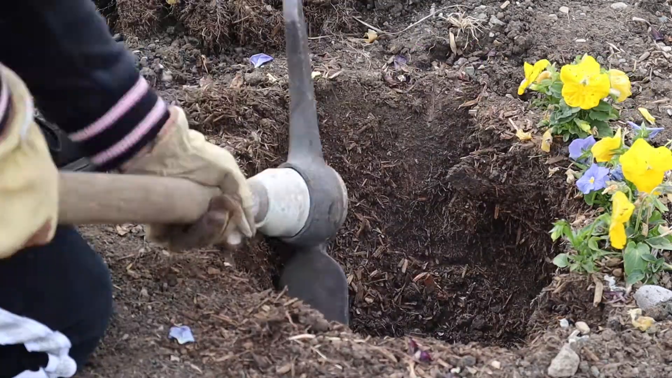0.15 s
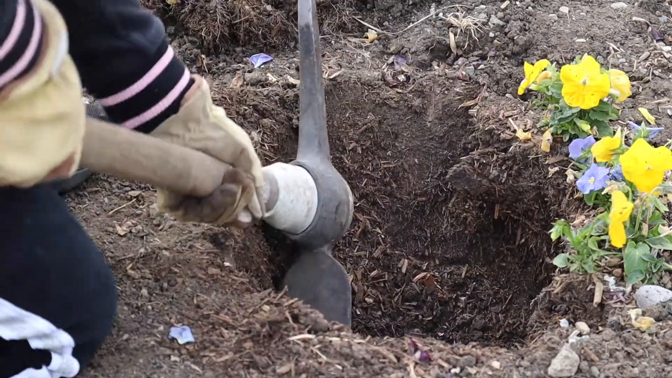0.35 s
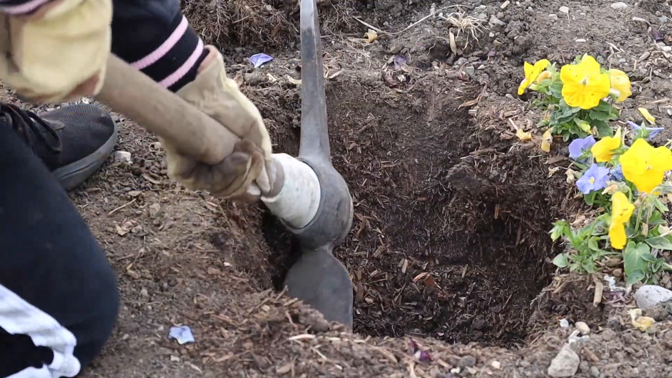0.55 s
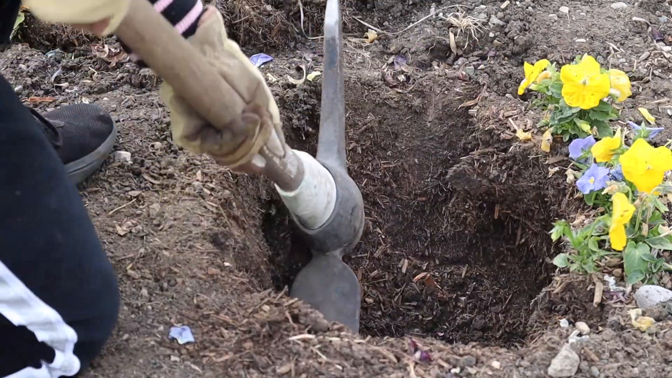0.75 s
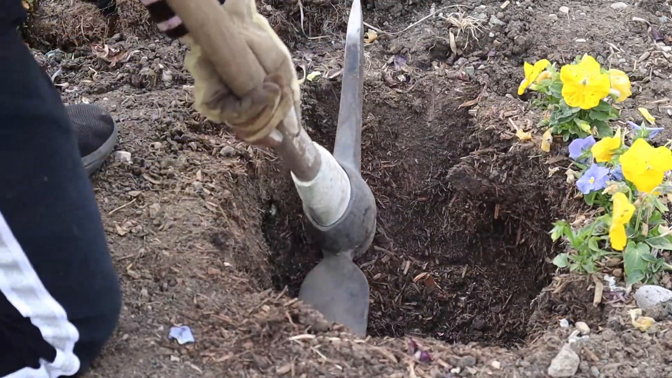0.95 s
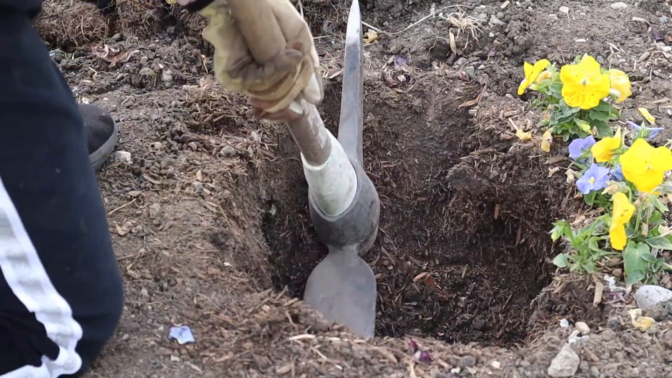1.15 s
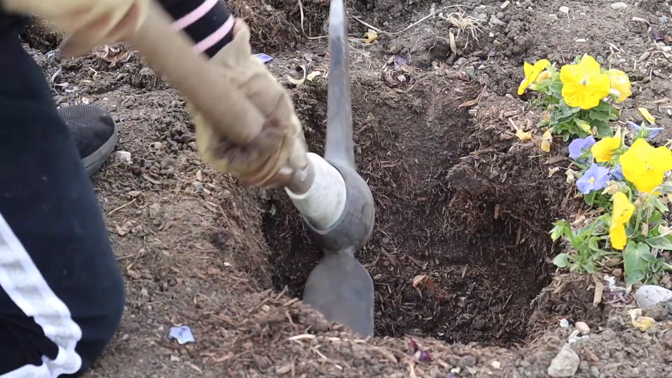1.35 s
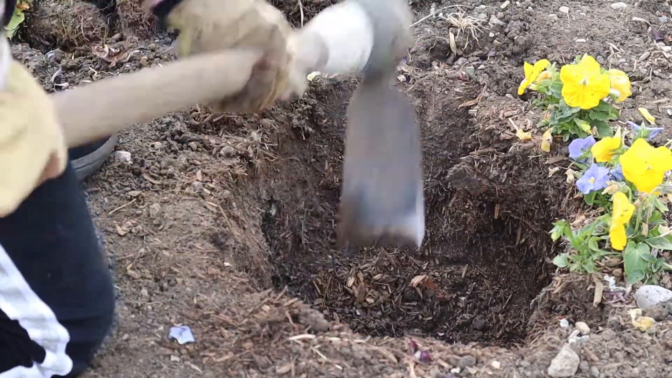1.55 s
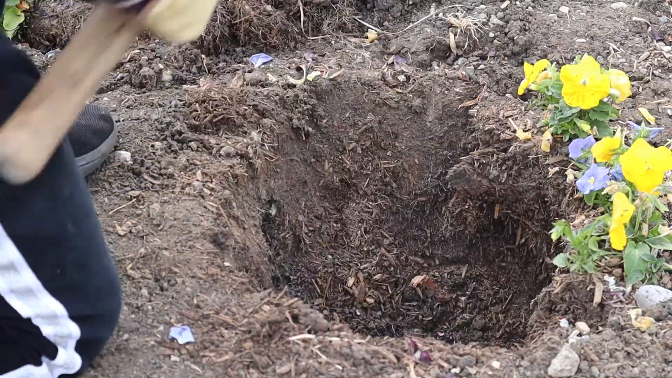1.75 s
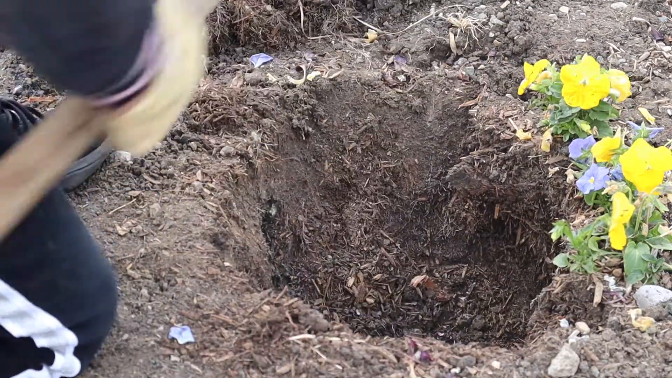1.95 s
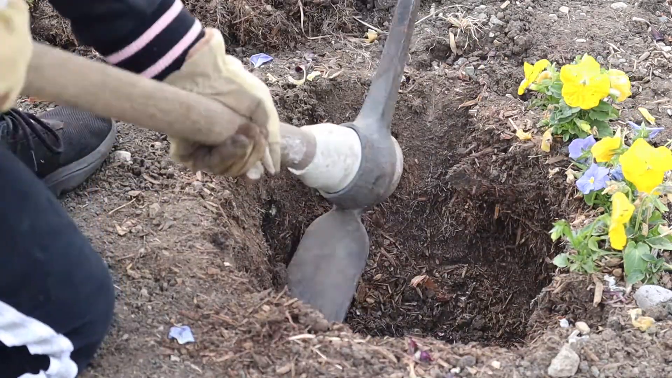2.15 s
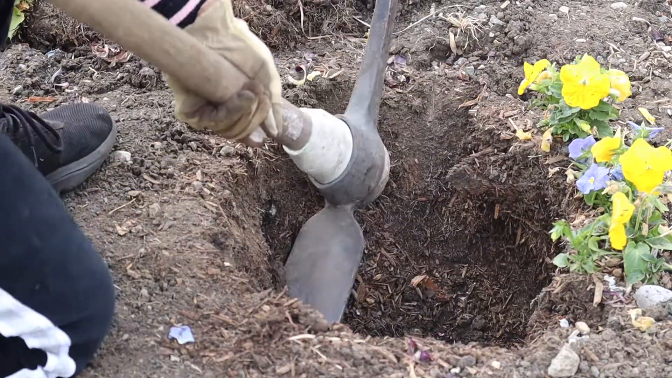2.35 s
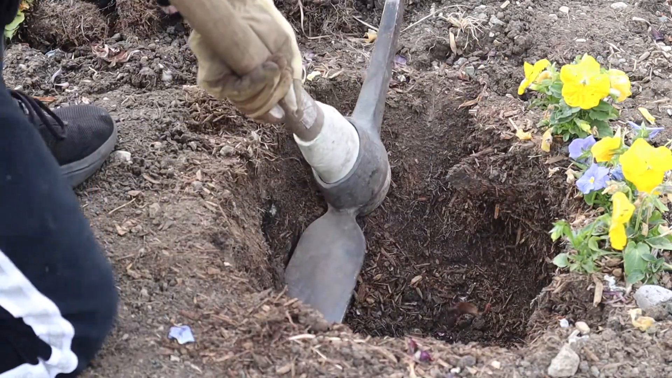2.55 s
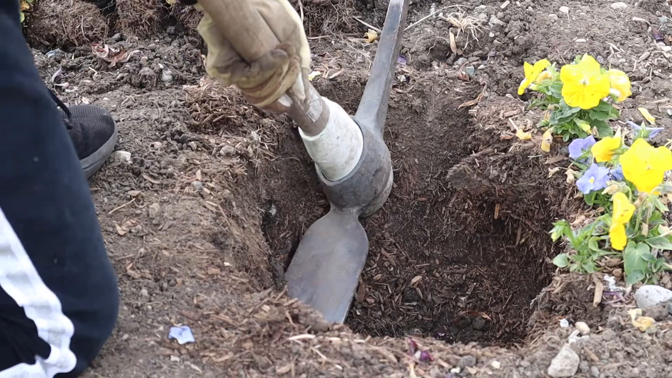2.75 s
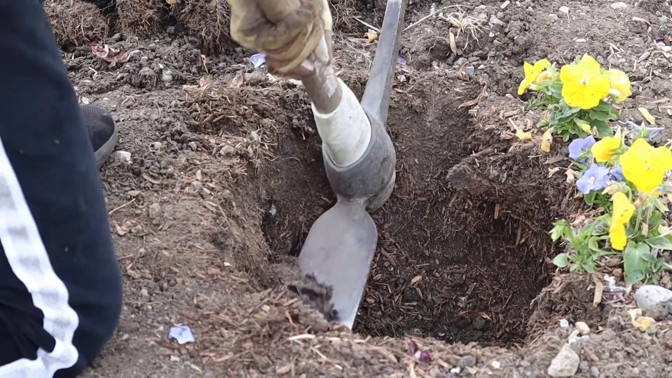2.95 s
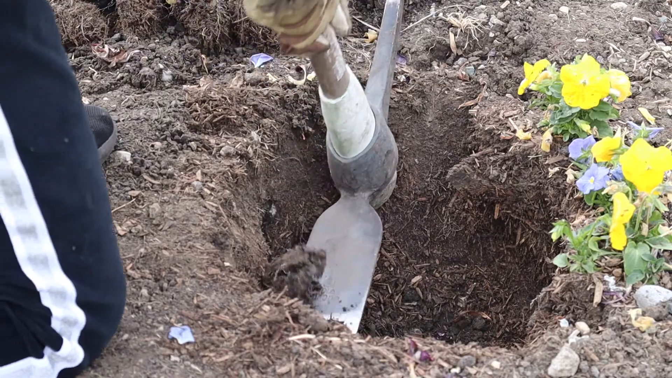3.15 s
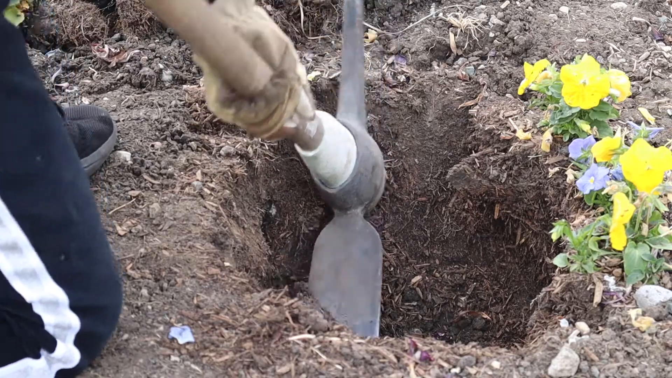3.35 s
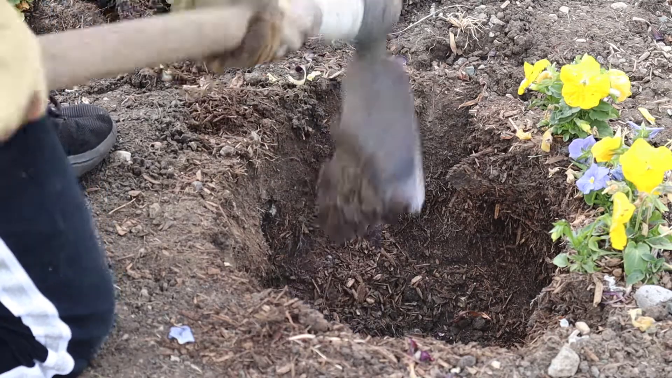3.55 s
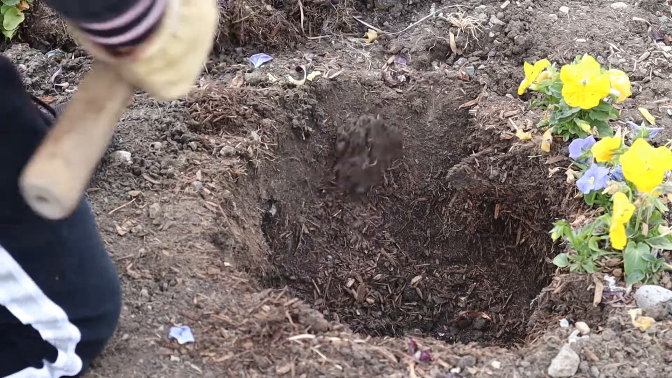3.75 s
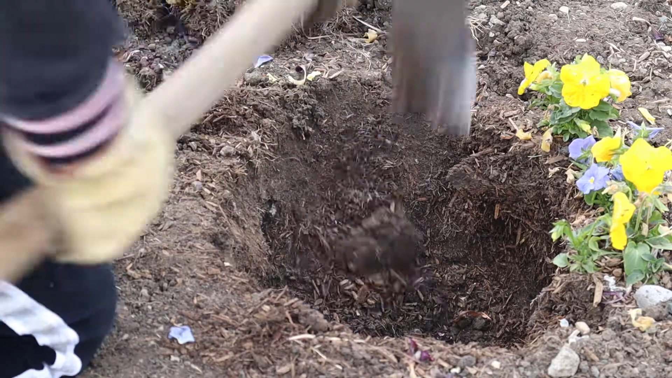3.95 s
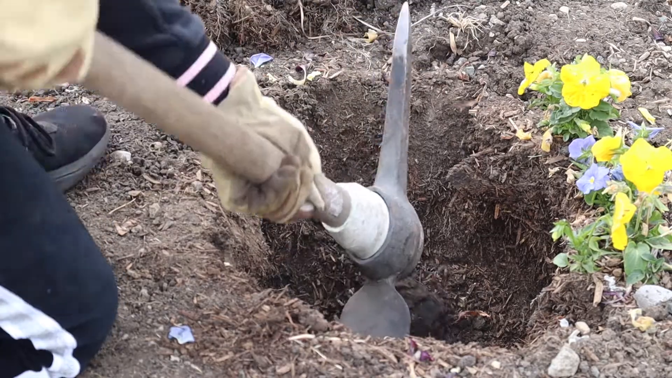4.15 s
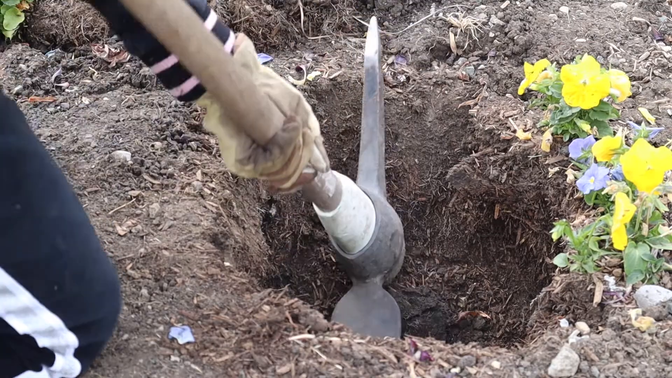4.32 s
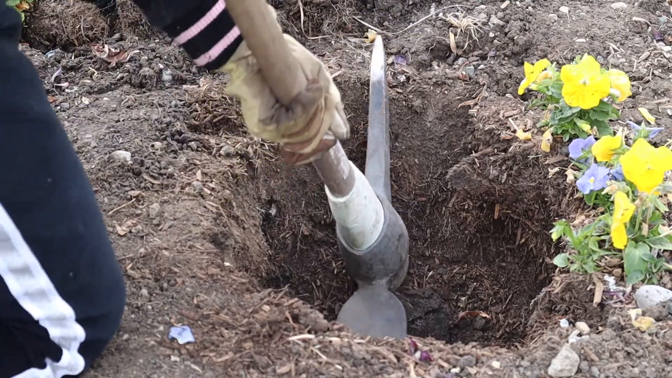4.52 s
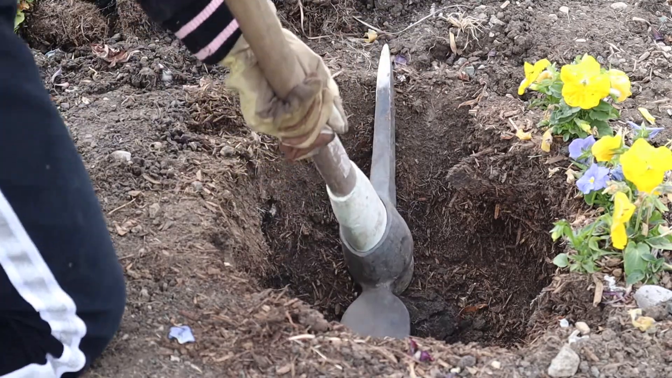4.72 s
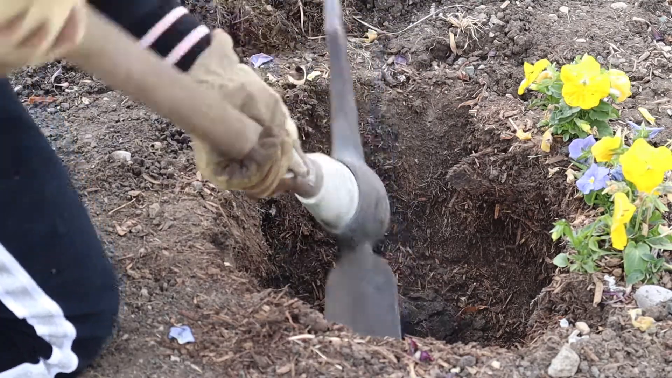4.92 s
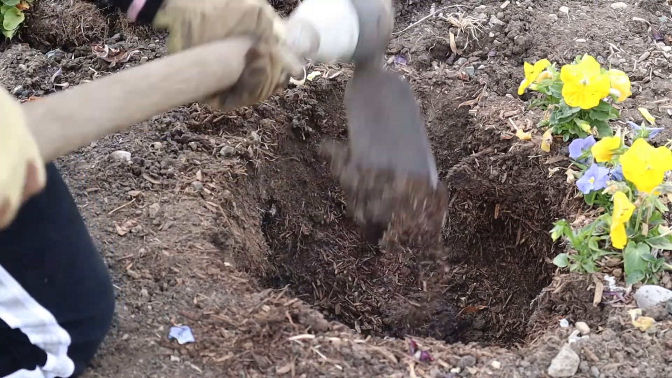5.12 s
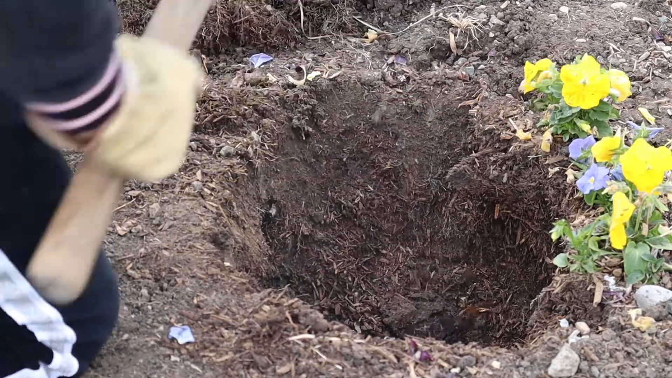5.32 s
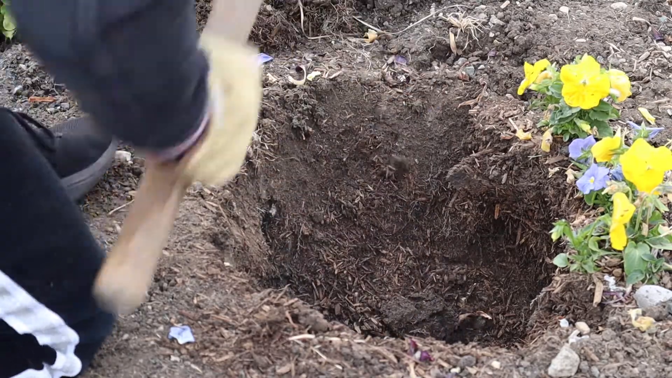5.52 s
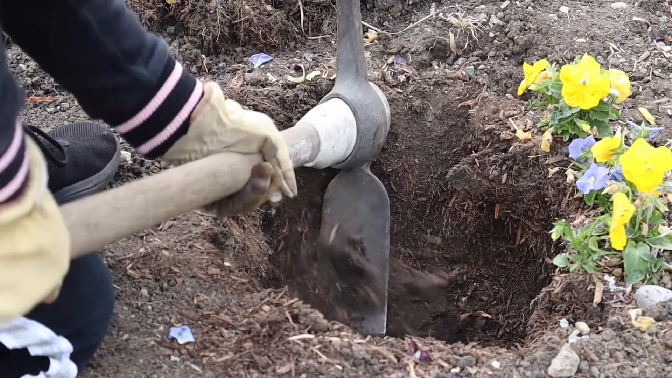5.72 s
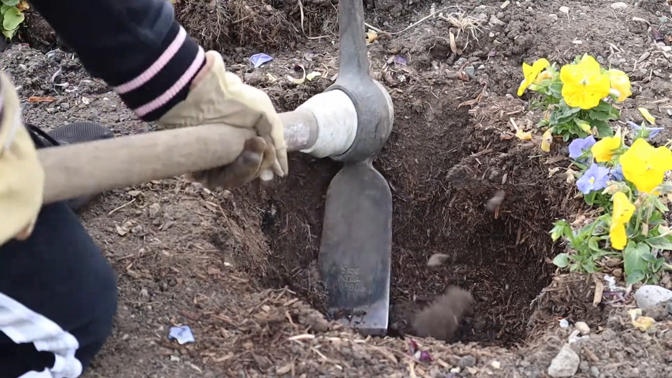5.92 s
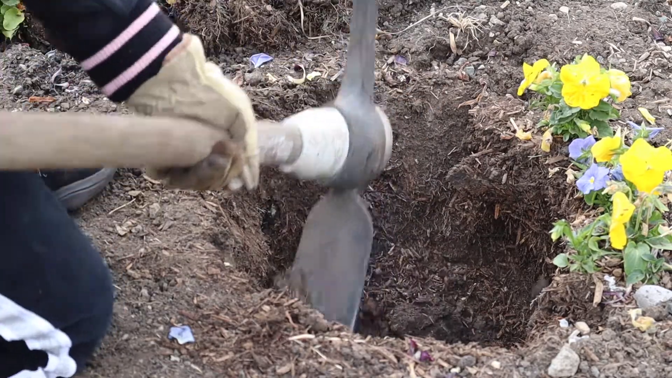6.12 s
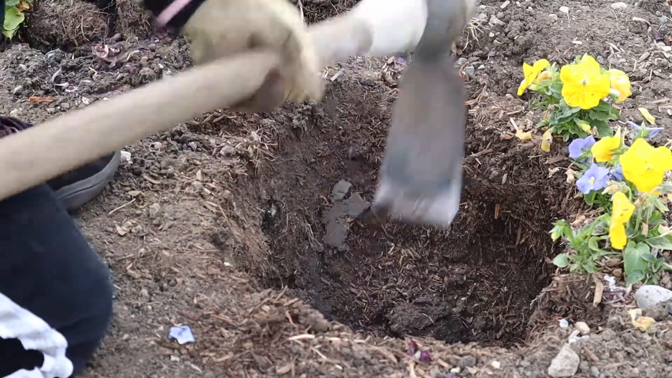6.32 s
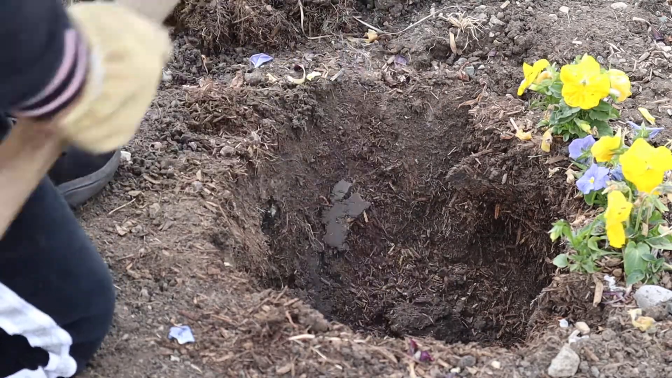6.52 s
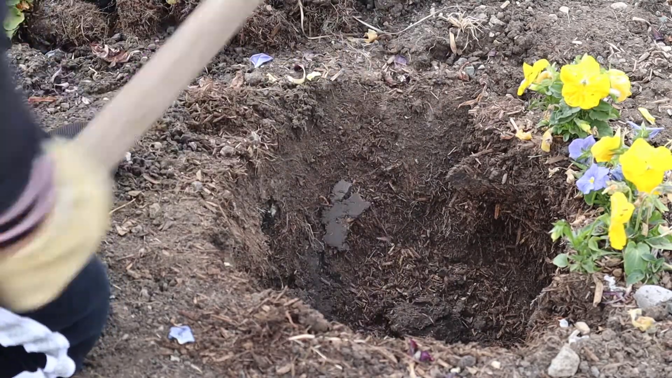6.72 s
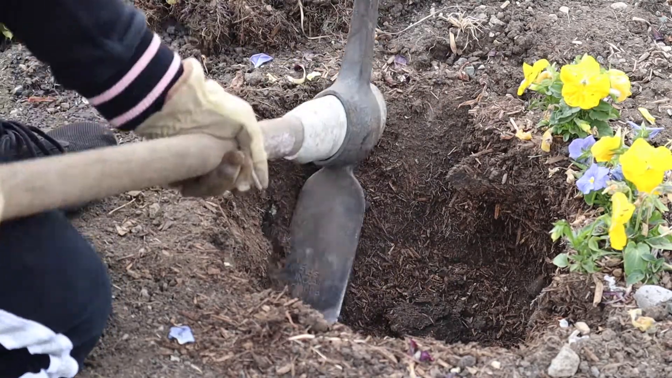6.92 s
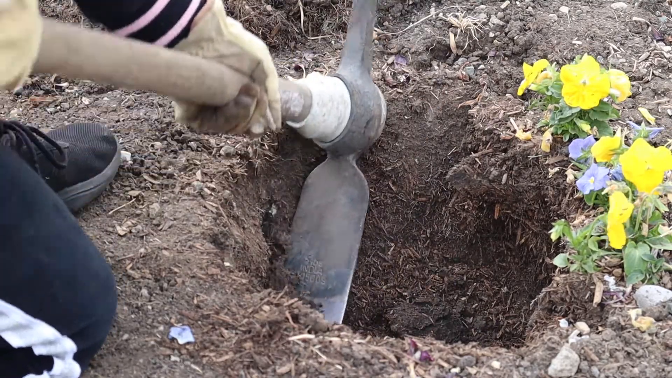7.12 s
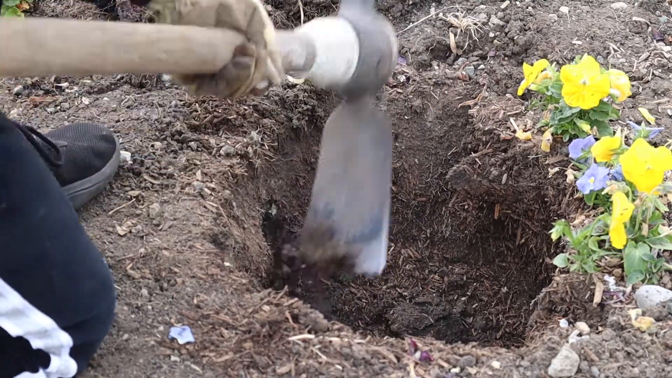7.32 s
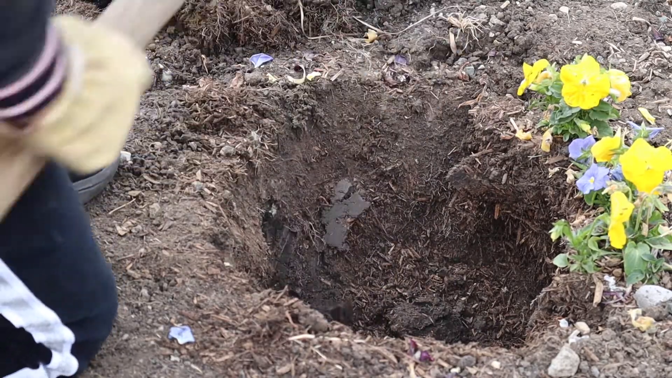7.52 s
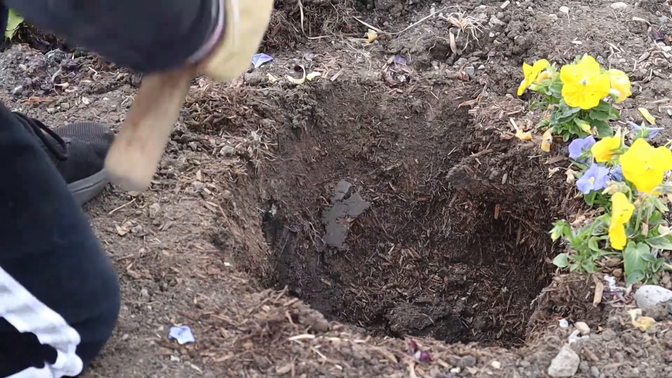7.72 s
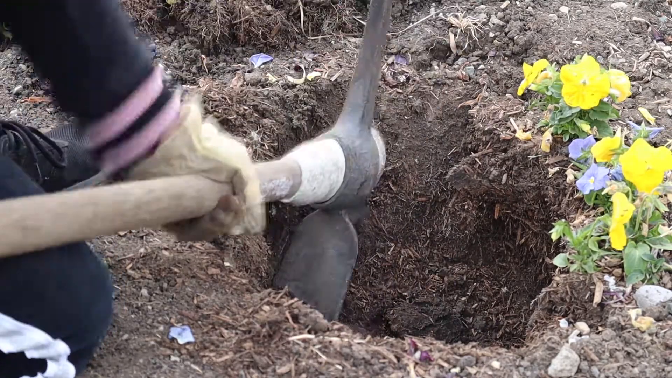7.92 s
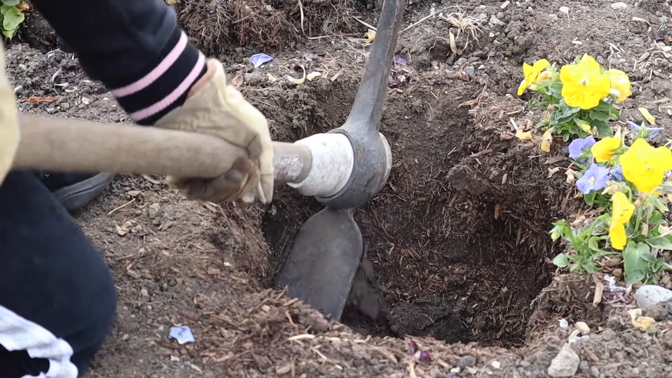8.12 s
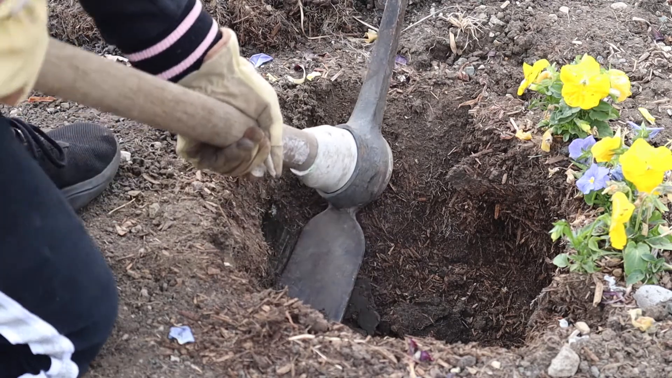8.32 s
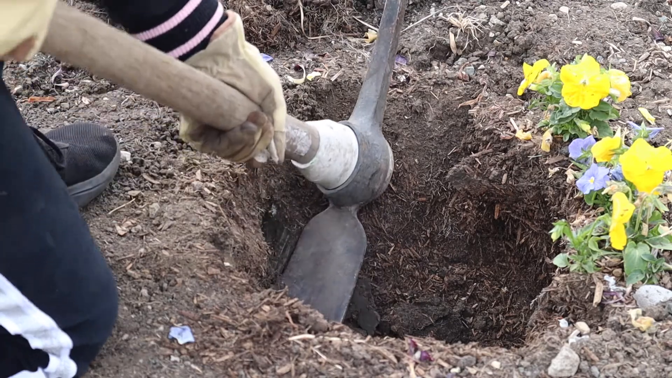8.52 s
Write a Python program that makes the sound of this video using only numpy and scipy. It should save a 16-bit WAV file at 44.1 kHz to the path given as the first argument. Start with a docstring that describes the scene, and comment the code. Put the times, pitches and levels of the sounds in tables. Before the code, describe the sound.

Outdoor garden digging heard right beside the hole: a crunchy, deep first chop, then sharper thuds, grit clinking under steel in the later blows, loose soil trickling and cloth brushing in between. Songbirds fill the gaps, with quick high chirps swelling into a raspy, buzzing burst before the third blow and another bright run before the fifth, over distant whistles, faint hum and low wind.

```python
"""Chopping clay in a garden

A mattock chops six times into hard clay: shaped noise crunches, the stop slaps air and sets hole, steel
and ground modes ringing, and short grit bursts clink. Between blows crumbs patter and a sleeve rustles.
Birds sing gliding sines with trills, twittering close by and whistling farther off in more echo.
Behind them lie a faint outdoor hum, gusty wind and a low rumble after each blow, all filtered noise."""
import sys
import numpy as np
from scipy import signal
from scipy.fft import rfft, irfft, next_fast_len
from scipy.io import wavfile

SR = 44100
rng = np.random.default_rng(int(sys.argv[2]) if len(sys.argv) > 2 else 0)


def wav_record(signal):
    """Record a signal, one row per channel, as 16-bit PCM in the file named by sys.argv[1]."""
    frames = np.transpose(np.atleast_2d(signal))
    bounded = np.clip(frames, -1, 1)
    # unit amplitude maps onto the largest positive 16-bit level
    quanta = np.round(bounded * 32767).astype(np.int16)
    wavfile.write(sys.argv[1], SR, quanta)


N = 377937

# Mattock blows: (blade stop [s], cutting time before it [s], thud drive [dB], slap level [dB],
# slap length [s], crunch level [dB], crunch tilt [dB/octave], blade drive [dB], ground drive [dB])
BLOWS = [(0.1645, 0.012, -9, -10.5, 0.0029, -4, -2, -32, 1.5),
         (2.076, 0.00071, -6.5, -3, 0.0015, -9, -1.5, -16, -8.5),
         (4.059, .004, -4.5, -0.5, 0.0022, -12, 0.5, -13, -6.5),
         (5.7077, 0.0043, -9.5, -3.5, 0.0013, -10, 2.5, -16, -7),
         (6.8276, 0.00097, -12.5, -5, 0.0018, -12.5, 2.5, -4.5, -9.5),
         (7.9644, 0.0082, -10, -2.5, 0.0016, -4, -0.5, -40, -7)]
EARS = np.array([[1], [-1]])   # opposite sign at the two ears


def from_db(db):
    """Decibels to amplitude ratio."""
    return 10 ** (np.asarray(db) / 20)


def rms_one(x):
    """Scale to rms 1."""
    return x / np.sqrt(np.mean(x ** 2) + 1e-20)


def add(out, time_s, sound):
    """Mix a sound in at a given time, cut off at the end of the scene."""
    i = max(int(time_s * SR), 0)
    out[i:i + len(sound)] += sound[:max(N - i, 0)]


def drift(rate_hz, size):
    """Smooth random wander: Gaussian knots of spread 1 joined by straight lines."""
    knots = rng.standard_normal(int(size * rate_hz / SR) + 3)
    return np.interp(np.arange(size) * rate_hz / SR, np.arange(len(knots)), knots)


def colour(x, spectrum, tilt_db=0):
    """Filter to a spectrum, tilted per octave about 700 Hz (no further below 175 Hz); rms 1."""
    size = next_fast_len(len(x))
    octave = np.log2(np.maximum(np.fft.rfftfreq(size, 1 / SR), 1) / 700)
    hz, db = np.transpose(spectrum)
    shape_db = np.interp(octave, np.log2(hz / 700), db) + tilt_db * np.maximum(octave, -2)
    filtered = irfft(rfft(x, size) * from_db(shape_db), size)
    return rms_one(filtered[:len(x)])


def noise(spectrum, size, tilt_db=0):
    """Coloured Gaussian noise of rms 1."""
    return colour(rng.standard_normal(size), spectrum, tilt_db)


def swells(rows):
    """Gain over time: each swell climbs to its peak and dies away, evenly in dB; the loudest wins."""
    range_db = 20.5   # gained over the rise, lost over the fall
    t = np.arange(N) / SR
    levels_db = []
    for peak_s, rise_s, fall_s, db in rows:
        before = (peak_s - t) / max(rise_s, .002)
        after = (t - peak_s) / max(fall_s, .002)
        levels_db.append(db - range_db * np.maximum(before, after))
    return from_db(np.max(levels_db, axis=0))


def ring(force, hz, t60_s):
    """Damped mode: a unit click sets a sine of height 1 ringing."""
    r, w = from_db(-60 / (t60_s * SR)), 2 * np.pi * hz / SR
    return signal.lfilter([0, np.sin(w)], [1, -2 * r * np.cos(w), r * r], force + 1e-18)


def push(length_s):
    """Smooth force pulse of unit area."""
    pulse = np.hanning(max(int(length_s * SR), 3) + 2)
    return pulse / pulse.sum()


def slap(length_s):
    """Air squeezed out by the blade: one swing up and one down, of height 1."""
    swing = np.diff(push(length_s))
    return swing / swing.max()


def mattock(entry_db=-11, crunch_s=0.0049, settle_db=-24, settle_s=0.026, boom_delay_s=0.0081, boom_push_s=.011):
    """The blade shears clay, then stops dead; the stop drives air, hole, steel and ground."""
    # Steel meets grit: (time [s], level [dB], decay time [s], blade drive relative to scratch [dB])
    stones = [(0.151, -37.5, 0.0055, -21), (0.169, -23.5, 0.0028, -43), (2.0754, -26, 0.012, -46),
              (4.0662, -19.5, 0.0021, -34), (5.707, -29, 0.0023, -31), (5.7092, -3.5, 0.0032, -36.5),
              (5.7158, -9.5, 0.002, -39), (5.721, -16.5, 0.0021, -26), (5.730, -16.5, 0.00096, -24.5),
              (5.769, -35, 0.0025, -36), (5.909, -30.5, 0.0023, -34), (5.895, -27.5, 0.0017, -36),
              (5.934, -33, 0.0026, -37), (6.058, -28.5, 0.011, -21.5), (6.071, -29.5, 0.0037, -23),
              (6.112, -37.5, 0.0047, -15), (6.8248, -6, 0.0023, -28), (6.833, -38, 0.0042, -29),
              (6.8456, -22, 0.0011, -36), (7.193, -31, 0.0015, -43), (7.966, -7, 0.0014, -48)]
    # Clay hole modes: (frequency [Hz], level [dB], t60 [s])
    clay_modes = [(169, -11, 0.14), (279, 0.5, 0.064), (418, -19.5, 0.017), (610, -24, 0.021),
                  (720, 2, 0.015)]
    # Head and handle modes: (frequency [Hz], level [dB], t60 [s])
    steel_modes = [(562, -10, .04), (700, -2.5, 0.057), (875, -3.5, 0.052), (994, 5.5, 0.036),
                   (1450, -38, .025), (1680, -3.5, 0.063), (2343, -1.5, 0.029), (2516, -6, 0.039),
                   (3590, -9, 0.064), (4243, -0.5, 0.054), (6530, -9, 0.036), (8750, -32, 0.018),
                   (10170, -0.5, 0.017), (14200, -10, .025)]
    # Springy ground, two close modes: (frequency [Hz], t60 [s])
    ground_modes = [(83, 0.27), (97, 0.34)]
    # Shearing clay spectrum: (frequency [Hz], relative level [dB])
    crunch = [(60, -40), (150, 4.5), (280, 1), (420, -6), (700, -10.5), (1000, -12), (1500, -9),
              (2200, -23.5), (4000, -26), (8000, -34), (16000, -48)]
    # Grit scratch spectrum: (frequency [Hz], relative level [dB])
    grit = [(300, 15), (1000, 0), (2500, 7.5), (4000, 6.5), (6000, -8), (7200, 2), (8800, 3), (11500, -7.5),
            (14000, -8), (16000, -20)]

    direct, thud, knock, shove = np.zeros((4, N))
    t = np.arange(SR // 4) / SR
    for stop_s, cut_s, thud_db, slap_db, contact_s, crunch_db, tilt_db, ring_db, boom_db in BLOWS:
        since_stop = np.maximum(t - cut_s, 0)
        sinking = from_db(entry_db) * np.sqrt(2 * t / cut_s)   # resistance grows with depth
        settling = np.exp(-since_stop / crunch_s) + from_db(settle_db) * np.exp(-since_stop / settle_s)
        shear = np.where(t < cut_s, sinking, settling)
        add(direct, stop_s - cut_s, from_db(crunch_db) * shear * noise(crunch, len(t), tilt_db))
        add(direct, stop_s, from_db(slap_db) * slap(contact_s))
        add(thud, stop_s, from_db(thud_db) * push(contact_s / 2))
        add(knock, stop_s, from_db(ring_db) * push(contact_s / 2))
        add(shove, stop_s + boom_delay_s, from_db(boom_db) * push(boom_push_s))
    for time_s, db, decay_s, ring_db in stones:
        scratch = from_db(db) * np.exp(-t / decay_s) * noise(grit, len(t))
        add(direct, time_s, scratch)
        add(knock, time_s, from_db(ring_db) * scratch)

    clay = sum(from_db(db) * ring(thud, hz, t60_s) for hz, db, t60_s in clay_modes)
    steel = sum((-1) ** k * from_db(db) * ring(knock, hz, t60_s)
                for k, (hz, db, t60_s) in enumerate(steel_modes))
    # the ground modes start opposed, so the boom swells and then beats
    boom = sum((-1) ** k * ring(shove, hz, t60_s) for k, (hz, t60_s) in enumerate(ground_modes))
    return direct + clay + steel + boom


def grains(spectrum, per_s, spread_db):
    """Tiny contacts of uneven size at random moments; rms 1."""
    sizes = from_db(spread_db * np.minimum(rng.exponential(1, N), 4)) * rng.choice([-1, 1], N)
    hits = rng.random(N) < per_s / SR
    return colour(sizes * hits, spectrum)


def handling(cloth_db=9):
    """Crumbs patter back into the hole (random grains) while cloth rubs (noise)."""
    # Crumb spectrum: (frequency [Hz], relative level [dB])
    crumbs = [(150, 1.5), (400, 6), (900, 7.5), (1600, 0.5), (3000, -8), (6000, -9), (10000, -36),
              (16000, -32)]
    # Sleeve and glove spectrum: (frequency [Hz], relative level [dB])
    fabric = [(400, -25), (1500, -7), (3500, 7), (6000, 3), (9000, -3), (12000, -11.5), (16000, -14)]
    # Soil sliding off the blade: (peak time [s], rise [s], fall [s], peak level [dB])
    spills = [(1.37, 0.095, 0.035, -41.5), (2.275, .04, 0.066, -38.5), (3.02, 0.024, 0.038, -34),
              (4.225, .03, 0.15, -33.5), (4.29, 0.11, 0.04, -30.5), (4.83, .06, .2, -45.5),
              (5.933, .01, 0.035, -40), (6.066, 0.073, 0.055, -35), (6.112, .01, 0.18, -35.5),
              (7.11, 0.067, 0.061, -37.5), (7.197, 0.029, 0.013, -30.5)]
    # Sleeve and glove rubs: (peak time [s], rise [s], fall [s], peak level before cloth_db [dB])
    rustles = [(.78, .3, 0.077, -46.5), (1.275, 0.097, 0.7, -53.5), (2.45, 0.99, .8, -53),
               (3.02, 1, 0.33, -51.5), (3.49, .08, .08, -48.5), (3.572, 0.027, 0.064, -46),
               (3.85, 0.35, 0.34, -52)]
    soil = swells(spills) * grains(crumbs, per_s=1000, spread_db=2.5)
    cloth = swells(rustles) * noise(fabric, N)
    return soil + from_db(cloth_db) * cloth


def garden(x, wet_db, t60_s, width, early_db, early_s):
    """One quick echo of opposite sign at the two ears, and a longer tail scattered by walls and foliage."""
    t = np.arange(SR) / SR
    fade = from_db(-60 * t / t60_s) * (1 - np.exp(-t / 0.0024))
    fade = fade / np.linalg.norm(fade)
    mid, side = (signal.oaconvolve(x, rng.standard_normal(SR) * fade)[:N] for _ in range(2))
    early = np.interp(np.arange(N) - early_s * SR, np.arange(N), x)
    difference = from_db(wet_db) * width * side + from_db(early_db) * early
    return x + from_db(wet_db) * mid + difference * EARS


def call(shape, time_s, db, pitch=1, stretch=1):
    """The notes of one call, moved in time, level and pitch."""
    return [(time_s + at_s * stretch, length_s * stretch, start * pitch, middle * pitch, end * pitch,
             db + note_db, depth_hz)
            for at_s, length_s, start, middle, end, note_db, depth_hz in shape]


def repeats(shape, rows):
    """The notes of a call every time it is sung."""
    return [note for row in rows for note in call(shape, *row)]


def glides(rows, bend):
    """Single notes that do a share (bend) of their log-pitch glide by the middle."""
    return [(time_s, length_s, start, start * (end / start) ** bend, end, db, 0)
            for time_s, length_s, start, end, db in rows]


def run_of_notes(course, gap_s, length_s, scatter, slope, depth_hz, uneven_db):
    """Notes of uneven length, slope and strength, scattered about a course of pitch and level."""
    times, hz, levels_db = np.transpose(course)
    chance = rng.uniform(-1, 1, (128, 5))
    notes = []
    for time_s, (late, high, long, steep, loud) in zip(np.arange(times[0], times[-1], gap_s), chance):
        pitch = np.interp(time_s, times, hz) * (1 + scatter * high)
        sag = slope * (.5 + steep)   # most notes fall
        db = np.interp(time_s, times, levels_db) + uneven_db * loud
        notes.append((time_s + late * gap_s / 2, length_s * (1 + long / 2),
                      pitch * (1 + sag), pitch, pitch * (1 - sag), db, depth_hz))
    return notes


def song(notes, trill_hz, waver, flutter_db, edge, overtone_db):
    """Each note is one gliding whistle; a fast trill swings its pitch and loudness into a buzz."""
    out = np.zeros(N)
    for time_s, length_s, start_hz, middle_hz, end_hz, db, depth_hz in notes:
        size = int(length_s * SR)
        u = np.linspace(0, 1, size)
        curve = np.polyfit([0, .5, 1], np.log([start_hz, middle_hz, end_hz]), 2)
        glide_hz = np.exp(np.polyval(curve, u))
        beat = 2 * np.pi * np.cumsum(trill_hz * (1 + .15 * drift(100, size))) / SR
        swing_hz = depth_hz * (np.sin(beat) + .3 * drift(1200, size))
        phase = 2 * np.pi * np.cumsum(glide_hz * (1 + waver * drift(95, size)) + swing_hz) / SR
        throb = 1 + np.clip(4 * depth_hz / middle_hz, 0, .8) * np.cos(beat)
        flutter = from_db(flutter_db * drift(140, size))
        swell = rms_one(signal.windows.tukey(size, np.clip(edge, .05, 1)) * throb * flutter)
        whistle = np.sin(phase) + from_db(overtone_db) * np.sin(2 * phase)
        add(out, time_s, from_db(db) * swell * whistle)
    return out


def birds(far_db=-2):
    """Quick twitterers close by, and slower whistlers deep in the garden's echo."""
    # Calls, note by note: (time into call [s], length [s], start [Hz], middle [Hz], end [Hz],
    # relative level [dB], trill depth [Hz])
    # short flicks, then a high falling note
    chirp = [(0, 0.0138, 4005, 4054, 4530, -3, 155), (.009, 0.0083, 4840, 4005, 3100, -4.5, 3),
             (.024, 0.0214, 3980, 3780, 3185, -2, 77), (.061, .028, 6030, 4910, 4690, 1, 0)]
    # high note that drops in two steps; columns as chirp
    slur = [(0, 0.044, 6950, 5965, 6010, -1.5, 0), (.034, .056, 5950, 4100, 3700, -3, 0)]
    # quick dip, two lifts and a falling rasp; columns as chirp
    rasp = [(0, .018, 4429, 3950, 3360, 1, 121), (.017, .016, 3410, 3970, 4100, 0.48, 120),
            (.042, .02, 3244, 3600, 4100, -.5, 100), (.053, .06, 3550, 3087, 2770, -2, 372)]
    # buzz that sinks, climbs and arches over; columns as chirp
    buzz = [(0, .075, 3900, 2850, 2500, -5, 397), (.07, .09, 2600, 3430, 3790, 0.5, 410),
            (.135, .225, 3940, 4370, 3910, 1.5, 430)]
    # steep rise that tips over into a buzzing fall; columns as chirp
    hook = [(0, 0.022, 5000, 6100, 7500, 0, 0), (.022, 0.02, 7360, 6260, 5400, 0, 600)]
    # whistle that sags, then climbs with a quaver; columns as chirp
    swoop = [(0, .12, 2300, 2056, 2075, 4.5, -9), (.22, .15, 2120, 2253, 2590, -5.5, 75),
             (.315, .05, 2250, 2450, 2750, 3.5, 86)]
    # long rounded dip that climbs back with a flutter; columns as chirp
    scoop = [(0, .14, 4650, 3400, 3250, -0.16, 8.6), (.137, .13, 3100, 3540, 4200, -.5, 130),
             (.257, .085, 4300, 4550, 4900, 0, 180)]
    # rising whistle that breaks into a trill; columns as chirp
    flourish = [(0, .06, 2034, 2225, 2420, 0, 0), (.05, 0.104, 2420, 2494, 2426, -2, 300)]
    # short note that leaps up and levels off; columns as chirp
    pip = [(0.0042, 0.037, 2400, 3560, 3400, 0, 0)]
    # four thin, quavering falls; columns as chirp
    warble = [(0, 0.071, 4500, 4200, 3540, -1, 300), (.13, 0.072, 6300, 6040, 5920, -1.5, 100),
              (.19, .065, 5600, 5250, 4370, 1, 550), (.248, .058, 8200, 8070, 7460, -10, 100)]

    # When each call is sung: (time [s], level [dB], pitch ratio [1], length ratio [1]), ratios optional
    chirp_times = [(1.952, -37.5, 1.07), (2.133, -41, 0.92), (2.289, -36, 1.02), (2.443, -32.5, 1.03),
                   (2.617, -29, 0.94), (5.778, -39, 0.99), (5.94, -35, 1.01), (6.256, -28, 1.0),
                   (6.419, -24.5, 0.98), (6.57, -23.5, 0.97), (6.733, -25, 0.99)]
    # slurs: columns as chirp_times
    slur_times = [(0.302, -43, 1.02, 0.88), (.624, -36, 1.01, 0.98), (.982, -34.5, 1, 1.07),
                  (1.651, -31, 1.06, 1.05), (2.33, -35, 1, 1.08), (2.668, -36.5, 0.95, 1.25),
                  (5.578, -47, 1, 1.1)]
    # rasps: columns as chirp_times
    rasp_times = [(2.775, -29.5, 1.015, 0.83), (2.934, -27, 0.99, 0.92), (3.088, -26, 1.007, 1.0),
                  (3.254, -24, .96, 1.25), (6.886, -27, .98, 1.0), (7.046, -27.5, 1.02, .88)]
    # buzzes: (time [s], level [dB])
    buzz_times = [(3.635, -28)]
    # hooks: (time [s], level [dB], pitch ratio [1])
    hook_times = [(3.472, -38, 1.06), (3.558, -32, 0.9)]
    # swoops: (time [s], level [dB])
    swoop_times = [(5.08, -40.5), (6.292, -42.5), (7.025, -42)]
    # scoops: (time [s], level [dB])
    scoop_times = [(.843, -37)]
    # flourishes: columns as chirp_times
    flourish_times = [(2.55, -45, 1.0, 0.76), (2.7, -39, .97, 0.77), (2.885, -40, .9, .6),
                      (4.162, -32.5, 1.0, 0.99), (8.138, -32, 0.98, 0.95)]
    # pips: columns as chirp_times
    pip_times = [(4.708, -40, 1.04, 1.1), (4.747, -33, 1.07, 1.2), (4.864, -36, 0.95, 0.79),
                 (4.898, -35.5, 1.04, 1.04), (7.314, -45, 2.09, 0.5), (7.634, -47, 2.1, 0.41)]
    # warbles: (time [s], level [dB])
    warble_times = [(8.24, -38)]

    # Quick single slides, close by: (time [s], length [s], start [Hz], end [Hz], level [dB])
    slides = [(1.325, 0.019, 7680, 3780, -36), (1.392, 0.032, 4340, 3600, -39),
              (2.008, .027, 7990, 4300, -32.5), (2.03, .07, 4330, 3450, -33.5),
              (2.853, .03, 4170, 6200, -25.5), (2.993, 0.023, 6000, 7300, -36.5),
              (3.075, 0.016, 6550, 4160, -35), (3.132, .026, 5300, 6070, -28),
              (3.155, .045, 5870, 4180, -33), (3.208, 0.032, 6030, 4460, -28),
              (3.372, 0.041, 4830, 5480, -29.5), (3.408, 0.024, 7000, 4680, -31),
              (3.428, 0.045, 4500, 4090, -33), (3.465, 0.05, 3860, 5200, -30),
              (5.33, 0.036, 5280, 6120, -44.5), (6.15, .032, 6000, 4540, -29)]
    # Slow single whistles, farther off: (time [s], length [s], start [Hz], end [Hz], level before far_db [dB])
    whistles = [(.01, 0.11, 1970, 2240, -31), (.262, .14, 2495, 2880, -43.5),
                (.302, 0.13, 1894, 1820, -33.5), (.442, 0.23, 3354, 3280, -44.5),
                (.46, 0.14, 2280, 2100, -30.5), (.46, .21, 2800, 2600, -46.5),
                (.572, 0.07, 1950, 1400, -36), (.598, 0.463, 2210, 2145, -41.5),
                (1.375, 0.13, 2880, 3190, -36.5), (1.582, 0.08, 4900, 4600, -40.5),
                (1.602, 0.11, 2273, 2183, -38), (1.802, 0.26, 2165, 2220, -40.5),
                (2.645, 0.036, 2310, 1730, -36), (2.802, 0.072, 2050, 1680, -40.5),
                (3.308, 0.11, 1915, 1793, -40), (3.492, .11, 2100, 1826, -36.5),
                (3.852, 0.126, 1915, 1856, -37.5), (4.33, 0.12, 2430, 2070, -27.5),
                (4.502, 0.077, 1930, 1730, -33.5), (5.43, .052, 4380, 4060, -40),
                (7.54, .035, 2110, 1840, -48), (7.752, 0.16, 2547, 2684, -41.5),
                (7.8, 0.18, 1877, 1970, -35.5), (7.84, 0.17, 2197, 2177, -40),
                (8.29, .13, 2313, 2370, -26.5), (8.468, 0.045, 1910, 1814, -30)]
    # Run of small near notes: (time [s], pitch [Hz], level [dB])
    chatter = [(2.2, 7750, -43), (2.62, 7710, -37), (2.76, 6490, -35), (2.92, 5500, -40), (3.05, 6200, -38),
               (3.2, 5010, -38), (3.38, 4630, -42)]
    # Two runs of thin far notes, each: (time [s], pitch [Hz], level before far_db [dB])
    lisping = [
        [(3.8, 5550, -49), (4.25, 7130, -49), (4.65, 6670, -58.5), (5.0, 7470, -53.5), (5.18, 6800, -49)],
        [(5.98, 6100, -54), (6.27, 7050, -55), (6.4, 5950, -41), (6.47, 5950, -44)],
    ]
    # Run of faint, distant notes: (time [s], pitch [Hz], level before far_db [dB])
    murmur = [(.2, 3083, -51), (1.7, 3910, -45), (3.0, 2650, -56), (4.6, 2913, -41), (5.4, 2590, -57),
              (6.5, 2600, -67), (7.3, 3220, -52.5), (8.4, 2800, -49.5)]

    twitter = (repeats(chirp, chirp_times) + repeats(slur, slur_times) + repeats(rasp, rasp_times)
               + repeats(hook, hook_times) + glides(slides, bend=.68)
               + run_of_notes(chatter, gap_s=.015, length_s=.03, scatter=.16, slope=.06,
                              depth_hz=201, uneven_db=5))
    whistling = (repeats(swoop, swoop_times) + repeats(scoop, scoop_times)
                 + repeats(flourish, flourish_times) + repeats(pip, pip_times)
                 + repeats(warble, warble_times) + glides(whistles, bend=.57)
                 + run_of_notes(murmur, gap_s=.24, length_s=.12, scatter=.18, slope=0.052,
                                depth_hz=30, uneven_db=7))
    for course in lisping:
        whistling += run_of_notes(course, gap_s=.11, length_s=0.076, scatter=0.068, slope=0.0253,
                                  depth_hz=88.5, uneven_db=6)

    near = song(twitter, trill_hz=229.4, waver=.01, flutter_db=3.5, edge=0.28, overtone_db=-32)
    near += song(repeats(buzz, buzz_times), trill_hz=177.6, waver=0.011, flutter_db=0.5, edge=.3,
                 overtone_db=-51)
    far = song(whistling, trill_hz=77.4, waver=0.0067, flutter_db=0.5, edge=0.23, overtone_db=-33)
    near_garden = garden(near, wet_db=-9, t60_s=0.55, width=0.31, early_db=-13, early_s=0.001206)
    far_garden = garden(far, wet_db=-2.5, t60_s=0.69, width=0.29, early_db=-10.5, early_s=0.002156)
    return near_garden + from_db(far_db) * far_garden


def outdoors(air_db=-40, side_db=-3, wind_db=-1):
    """Distant hum, a little different in each ear; lumpy wind on the microphone, a rumble after each blow."""
    # Hum spectrum: (frequency [Hz], relative level [dB])
    air_spectrum = [(15, -40), (25, -4.5), (107, 1), (297, -12.5), (582, -18), (1850, -19), (2230, -21),
                    (2420, -23), (4150, -25), (5880, -31), (15500, -40)]
    # Difference between the ears: (frequency [Hz], level before side_db [dB])
    ear_difference = [(60, -8), (110, -11), (200, -3.5), (380, -2.5), (700, -11.5), (1290, -6),
                      (2380, -7.5), (4400, 0), (8120, -51), (15000, -5)]
    # Wind and rumble spectrum: (frequency [Hz], relative level [dB])
    wind_spectrum = [(20, -4.5), (48, 1.5), (75, -3), (130, -18), (200, -20.5), (320, -40), (700, -75)]
    # Gusts: (peak time [s], rise [s], fall [s], peak level before wind_db [dB])
    gusts = [(1.26, 0.13, 0.99, -36), (2.55, 0.34, 0.79, -21.5), (3.51, 0.12, .5, -24),
             (3.75, 0.2, 0.28, -25), (4.34, 0.23, 0.26, -31), (4.7, 0.33, 1.3, -41),
             (5.44, 0.75, 0.18, -33.5), (6.15, 0.58, 0.29, -33.5), (8.03, 0.1, .5, -29),
             (8.57, 0.065, .2, -29.5)]
    hz, db = np.transpose(ear_difference)
    side_gain = from_db(side_db + np.interp(np.fft.rfftfreq(N, 1 / SR), hz, db))
    side = irfft(rfft(noise(air_spectrum, N)) * side_gain, N)
    air = noise(air_spectrum, N) + side * EARS
    rise_s, fall_s, rumble_db = 0.031, 0.39, -27.5   # rumble level before wind_db
    rumbles = [(stop_s + rise_s, rise_s, fall_s, rumble_db) for stop_s, *_ in BLOWS]
    wind = swells(gusts + rumbles) * noise(wind_spectrum, N)
    return from_db(air_db) * air + from_db(wind_db) * wind


def scene():
    """Digging right at the microphone, birds and air around it."""
    digging = garden(mattock() + handling(), wet_db=-17.5, t60_s=0.2, width=0.043, early_db=-53, early_s=.002)
    return digging + birds() + outdoors()


def record(dry):
    """Peaks beyond full scale clip; a steep low-pass cuts the top."""
    cutoff_hz = 15700
    clipped = np.clip(dry, -1, 1)
    lowpass = signal.ellip(10, .05, 60, cutoff_hz, fs=SR, output="sos")
    return signal.sosfiltfilt(lowpass, clipped)


dry = scene()
out = record(dry)
wav_record(out)
```